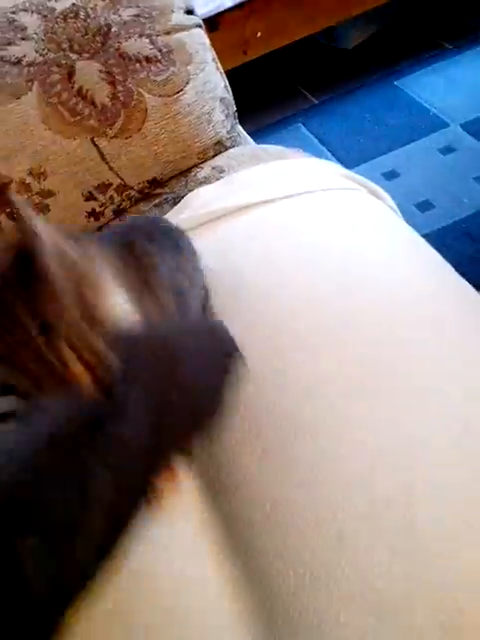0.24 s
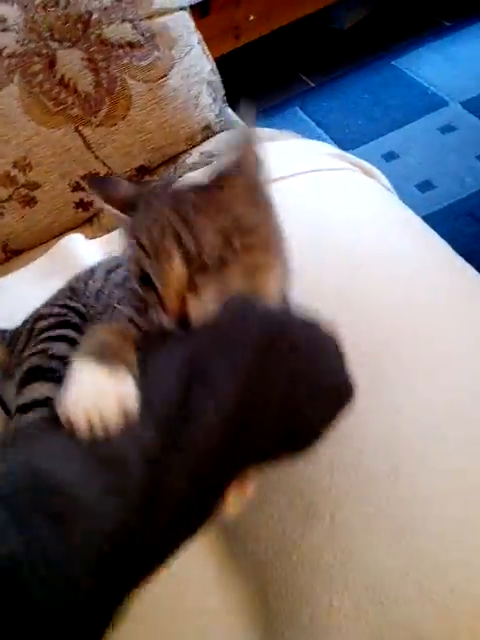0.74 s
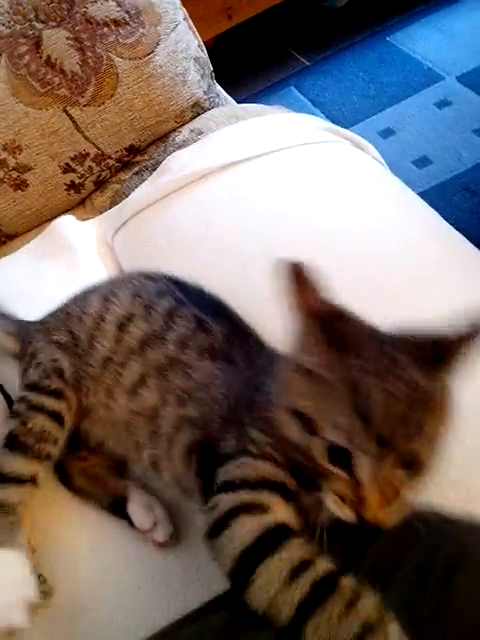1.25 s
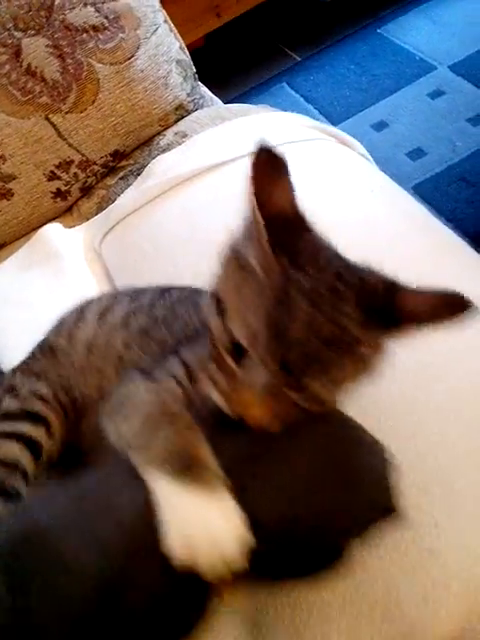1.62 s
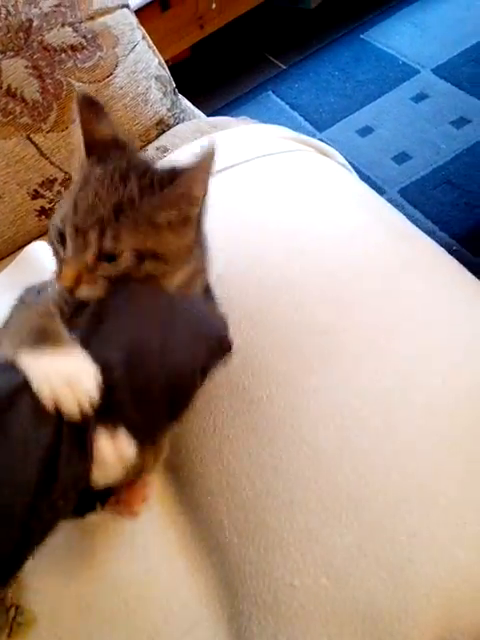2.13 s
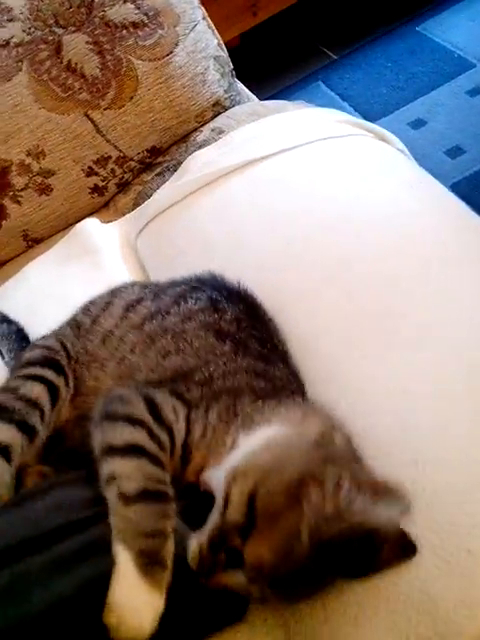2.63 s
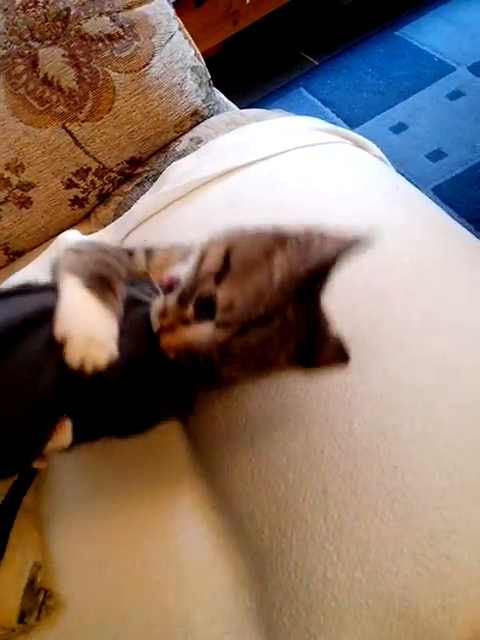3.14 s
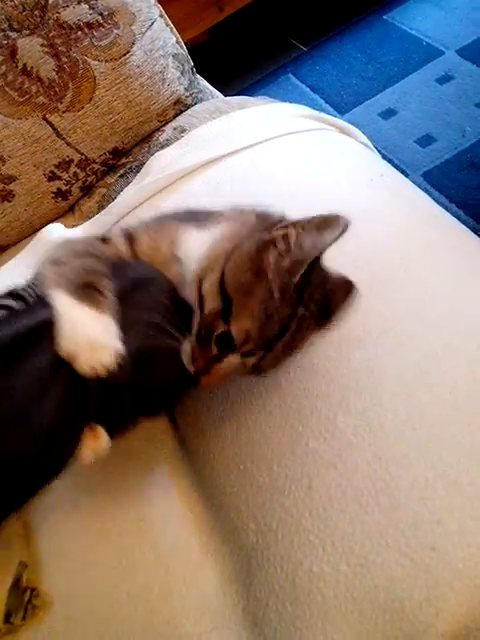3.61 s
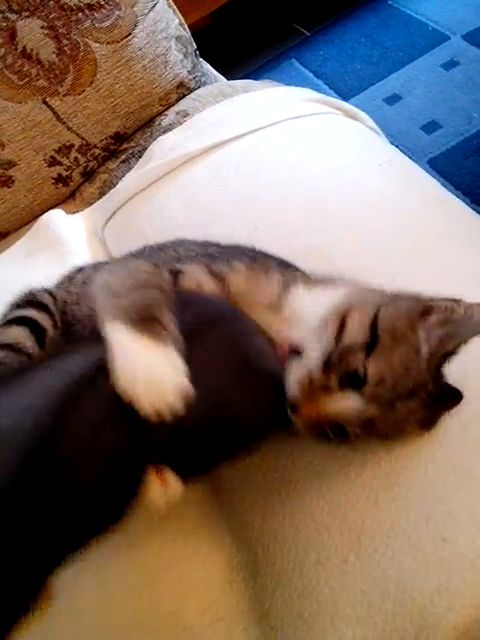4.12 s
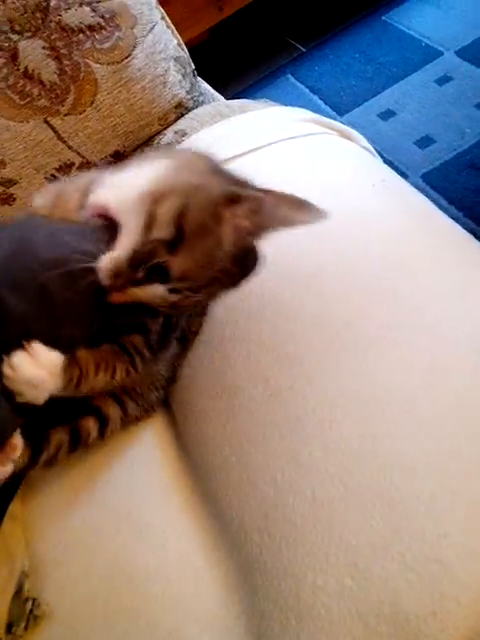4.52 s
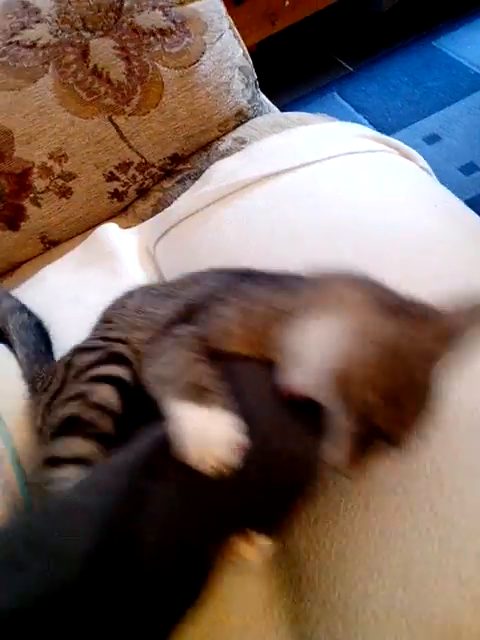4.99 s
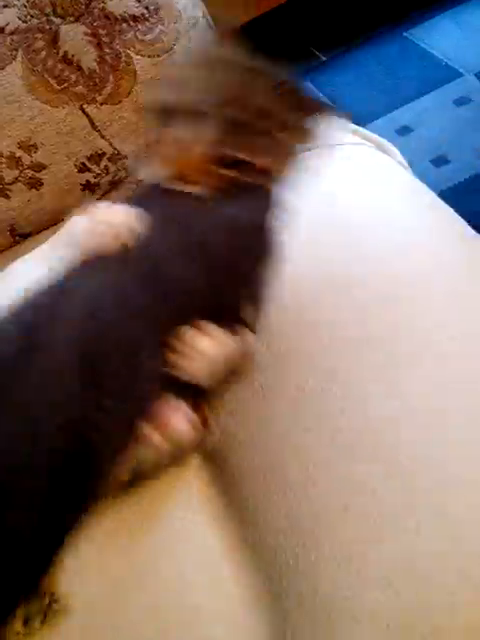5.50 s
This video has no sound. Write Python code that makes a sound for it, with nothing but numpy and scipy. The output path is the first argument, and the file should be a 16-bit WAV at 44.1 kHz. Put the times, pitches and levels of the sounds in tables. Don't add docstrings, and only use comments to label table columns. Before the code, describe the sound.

Bright thread-snag snaps and dull cushion thuds come in uneven bursts as a kitten grapples with a sleeve in a small hissy room.

```python
import sys
import numpy as np
from scipy import signal
from scipy.fft import rfft, irfft, next_fast_len
from scipy.io import wavfile
from scipy.ndimage import uniform_filter1d, map_coordinates

SR = 44100
rng = np.random.default_rng(int(sys.argv[2]) if len(sys.argv) > 2 else 0)


def inscribe(sig):
    pcm = np.round(np.clip(np.atleast_2d(sig).T, -1, 1) * 32767)
    wavfile.write(sys.argv[1], SR, pcm.astype(np.int16))


def how_loud(loudness_db):
    steps = np.asarray(loudness_db, float) / 20
    return 10 ** steps


N = 253575


def unit(x):
    return x / np.sqrt(np.mean(x ** 2) + 1e-20)


def along(points, hz):
    f, value = np.transpose(points)
    return np.interp(np.log(hz + 1), np.log(f + 1), value)


def filtered(x, response):
    m = next_fast_len(len(x) + 8192)
    spectrum = rfft(x, m) * response(np.fft.rfftfreq(m, 1 / SR))
    return irfft(spectrum, m)[:len(x)]


def resonance(f, hz, width_hz):
    return 1j * f * width_hz / (hz * hz - f * f + 1j * f * width_hz)


def wobble(rate):
    knots = rng.standard_normal(int(N * rate / SR) + 4)
    return map_coordinates(knots, [np.arange(N) * rate / SR])


def ring(t, hz, t60, attack):
    x = np.sin(2 * np.pi * hz * t) * how_loud(-60 * t / t60) * (1 - np.exp(-t / attack))
    return x / np.abs(x).max()


def mix_in(out, time_s, sound):
    out[round(time_s * SR):][:len(sound)] += sound


# (frequency [Hz], density [dB per Hz])
HISS_SPECTRUM = [(15, -63), (25, 2), (49, -18.5), (154, -0.5), (258, -4.5), (355, -6.5), (443, -7.5),
                 (477, -10), (672, -11.5), (1100, -14.5), (1670, -16), (3080, -19.5), (6770, -18),
                 (8040, -14), (8870, -20.5), (11500, -86), (19500, -120)]
HISS_DB = -52.5


def hiss():
    air = unit(filtered(rng.standard_normal(N), lambda f: how_loud(along(HISS_SPECTRUM, f))))
    bass = filtered(air, lambda f: 1 / (1 + (f / 600) ** 2))
    return how_loud(HISS_DB) * (air + bass * (how_loud(0.73 * wobble(24)) - 1))


# (frequency [Hz], t60 [s])
ROOM_DECAY = [(200, 0.16), (1500, 0.11), (4500, 0.13), (8000, 0.084)]
# (delay [s], level [dB])
ECHOES = [
    (.0108, -11),
    (.0168, -18),
    (.0205, -21),
    (.0235, -21),
    (.031, -22),
]


def answered(x, wet_db):
    hz, t, z = signal.stft(rng.standard_normal(len(x)), SR, nperseg=256)
    decay = how_loud(-60 * t / along(ROOM_DECAY, hz)[:, None])
    tail = signal.istft(z * decay, SR, nperseg=256)[1][:len(x)]
    tail = tail * np.clip(np.arange(len(x)) / SR / .016, 0, 1) ** 3
    response = how_loud(-1.0) * tail / np.linalg.norm(tail)
    for delay, db in ECHOES:
        first = int(delay * SR)
        response[first] += how_loud(db + 4.5)
        response[first + rng.integers(4, 30)] += how_loud(db + 1.5) * rng.standard_normal()
    return x + how_loud(wet_db) * signal.fftconvolve(x, response)[:len(x)]


# (frequency [Hz], density [dB per Hz])
CUSHION_SPECTRUM = [(70, -19), (130, 1), (250, -5), (480, -6.5), (800, -23), (1200, -43.5)]
# (start [s], length [s], level [dB])
SHIFTS = [(0.122, 0.12, -43), (0.523, 0.26, -47.5), (0.714, 0.13, -44), (.95, 0.21, -48),
          (1.338, 0.36, -49.5), (2.16, .08, -67), (2.548, 0.19, -42.5), (3.045, 0.26, -45),
          (4.342, 0.25, -56), (4.686, 0.035, -43.5), (5.325, 0.11, -64), (5.416, 0.22, -56),
          (5.701, 0.096, -43)]
SHIFT_RISE, SHIFT_HOLD = 0.23, 0.36


def rubbing():
    t = np.arange(N) / SR
    weight = np.zeros(N)
    for start, length, db in SHIFTS:
        rise = (t - start) / SHIFT_RISE
        fall = (start + length - t) / (1 - SHIFT_RISE - SHIFT_HOLD)
        weight += how_loud(db) * np.clip(np.minimum(rise, fall) / length, 0, 1)
    clumps = how_loud(4 * np.tanh(wobble(45)) + 3 * np.tanh(wobble(300)))
    slips = rng.standard_normal(N) * clumps
    grumble = unit(filtered(slips, lambda f: how_loud(along(CUSHION_SPECTRUM, f))))
    return uniform_filter1d(weight, size=441) * grumble


# (start [s], fall [s], centre [Hz], width over centre [ratio], peak level [dB])
FRAYS = [(0.16, 0.09, 2240, 0.74, -42.5), (0.159, 0.11, 6360, .14, -47), (2.041, 0.066, 1520, 0.37, -43.5),
         (2.04, .06, 6200, 0.15, -50), (2.216, 0.088, 1510, 0.25, -46.5), (2.608, 0.12, 1870, 1.7, -40),
         (2.616, 0.13, 3750, 0.26, -45), (2.626, 0.18, 5400, .14, -50.5), (2.643, .16, 466, 0.12, -41),
         (3.228, 0.1, 4270, .6, -46.5), (4.38, 0.11, 1500, 2, -46.5), (5.726, .043, 1860, 1.2, -40.5)]
FRAY_RISE_S = 0.0055
# (start [s], length [s], centre [Hz], width over centre [ratio], peak level [dB])
STROKES = [(0.239, 0.2, 2750, 0.45, -56.5), (0.558, 0.37, 4930, 0.49, -54.5), (0.587, 0.17, 610, 0.91, -48),
           (0.722, 0.14, 4330, 0.19, -49.5), (.72, 0.35, 597, 1, -55), (0.773, 0.09, 2440, 0.97, -48),
           (0.983, 0.24, 1460, 0.77, -54), (0.988, 0.24, 4440, 0.38, -56.5),
           (1.085, 0.074, 1260, 0.52, -47), (1.092, 0.086, 2240, 0.16, -58), (1.3, 0.18, 675, 0.75, -58.5),
           (1.422, 0.19, 3470, 0.22, -47), (1.425, 0.11, 860, 0.75, -50), (2.302, 0.074, 1680, .3, -54.5),
           (4.686, 0.09, 4170, 0.36, -47), (4.721, 0.062, 1680, 0.25, -54.5),
           (5.499, 0.26, 1160, 0.35, -59.5)]
STROKE_RISE = 0.23


def scuffs():
    out, t = np.zeros(N), np.arange(SR // 2) / SR
    grain = how_loud(3 * np.tanh(wobble(70)) + 3.5 * np.tanh(wobble(350)))
    rows = [(start, FRAY_RISE_S, *rest) for start, *rest in FRAYS]
    for start, length, *rest in STROKES:
        rows.append((start, STROKE_RISE * length, (1 - STROKE_RISE) * length, *rest))
    for start, rise, fall, hz, width, db in rows:
        swell = np.sin(np.pi / 2 * t / rise) ** 2
        stroke = np.where(t < rise, swell, how_loud(-20 * (t - rise) / fall))
        piece = out[round(start * SR):][:len(t)]
        slips = rng.standard_normal(len(t))
        slips[:len(piece)] *= grain[round(start * SR):][:len(t)]
        cloth = unit(filtered(slips, lambda f: resonance(f, hz, 1.42 * width * hz) ** 2))
        piece += (how_loud(db) * stroke * cloth)[:len(piece)]
    return out


# (time [s], peak level [dB], pitch [Hz])
THUMPS = [(0.149, -23.5, 463), (.214, -30, 268), (.22, -28.5, 180), (.623, -31.5, 298), (.63, -33, 145),
          (0.729, -38, 373), (.751, -31, 286), (.787, -36, 340), (1.012, -37.5, 342), (1.073, -35, 184),
          (1.34, -43, 324), (1.439, -37, 224), (1.487, -33, 342), (1.495, -25.5, 240), (1.56, -50, 252),
          (2.027, -22.5, 408), (2.089, -37, 151), (2.175, -49, 250), (2.205, -25, 410), (2.599, -21.5, 440),
          (2.612, -22.5, 291), (3.097, -25, 534), (3.156, -24, 263), (3.163, -24, 174), (3.459, -39.5, 320),
          (4.373, -34.5, 396), (4.414, -32, 407), (4.548, -42, 430), (4.688, -37, 144), (5.717, -28, 560)]
SWING_T60_S, SWING_REF_HZ, SWING_LAW = 0.018, 300, 0.59
# (time [s], peak level [dB], pitch [Hz])
KNOCKS = [(.15, -24.5, 733), (.623, -35, 624), (.751, -43, 760), (.787, -33, 545), (1.012, -38, 720),
          (1.073, -39.5, 765), (1.34, -40.5, 630), (2.027, -16, 578), (2.027, -26.5, 980),
          (2.173, -44, 546), (2.6, -23, 1050), (2.612, -50, 1000), (3.156, -25.5, 920), (3.459, -47, 830),
          (4.373, -37, 600), (4.472, -38, 400), (5.33, -38, 170), (5.415, -39.5, 300)]
KNOCK_T60_S, KNOCK_ATTACK_S = 0.0074, .001


def thumps():
    out, t = np.zeros(N + SR), np.arange(int(SR * .4)) / SR
    air_push = 0.041 * ring(t, 141, 0.24, 0.0088)
    for time, db, hz in THUMPS:
        t60 = SWING_T60_S * (SWING_REF_HZ / hz) ** SWING_LAW
        swing = ring(t, hz, t60, .5 / hz)
        mix_in(out, time + .0015, how_loud(db) * (answered(swing, wet_db=-19.5) + air_push))
    for time, db, hz in KNOCKS:
        knock = ring(t, hz, KNOCK_T60_S, KNOCK_ATTACK_S)
        mix_in(out, time + .0015, how_loud(db) * answered(knock, wet_db=-14.5))
    return out[:N]


# (time [s], snap peak level [dB], snap pitch [Hz], room level [dB], weave level [dB])
CLAWS = [(0.1511, -16, 4820, -5.5, -26), (0.2308, -33, 2890, -9, -14), (.7522, -44, 4630, -19, -32),
         (0.786, -22.5, 4380, -9, -26.5), (0.9811, -28, 3930, -2.5, -17.5),
         (0.9928, -26.5, 4040, -3.5, -17), (3.0978, -21.5, 5200, -3, -22), (3.1591, -26, 5020, -2.5, -26),
         (3.2194, -11, 4000, -17.5, -35), (3.2625, -38.5, 3320, 1.5, -28), (3.3626, -23, 3570, -9, -26.5),
         (3.459, -14, 3970, -13, -21), (4.374, -18, 4070, -12, -20.5), (4.4169, -22.5, 4080, -11.5, -22),
         (4.4724, -32, 3700, -9, -33), (4.5474, -24.5, 3800, -6.5, -22), (5.7191, -12.5, 4140, -2, -27.5),
         (5.7344, -15.5, 4760, -13, -22.5), (3.3797, -37, 4000, -13, -25)]
CLAW_WEAVE_HZ = 1187
# (time [s], snap peak level [dB], snap pitch [Hz], room level [dB], weave pitch [Hz])
TEETH = [(0.1604, -24.5, 5140, -7.5, 1420), (0.2206, -41, 2800, -2, 1090), (0.797, -28.5, 4000, -1, 1850),
         (1.0195, -38, 4840, 3, 2040), (1.309, -42, 3850, 0, 2080), (1.9123, -36.5, 3600, -6, 2030),
         (2.0279, -12, 4640, -13.5, 1620), (2.2071, -17, 4040, -10, 1360), (2.6009, -27.5, 4430, 1.5, 1070),
         (2.612, -22.5, 4000, -7, 1160), (4.6901, -30.5, 3780, -3.5, 1090), (5.5194, -44, 3950, -9, 900)]
TOOTH_WEAVE_DB = -10
# (frequency [Hz], width [Hz], level [dB])
PORT = [(3400, 520, -2.5), (4750, 1100, 0), (6500, 700, -8)]
# (frequency [Hz], width [Hz], depth [0-1])
CANCELLED = [(3880, 300, .5), (5800, 500, .4)]
CLAW_SHADE, TOOTH_SHADE = 0.18, 0.77
LEAD_IN_S = 220 / SR
SNAP_WIDTH = 0.5


def port(f):
    return sum(how_loud(db) * resonance(f, hz, width) for hz, width, db in PORT)


def cushion_dip(f):
    return (1 - .58 * resonance(f, 2550, 480)) ** 2


def arm_shadow(f, shade):
    dips = [1 - shade * depth * resonance(f, hz, width) for hz, width, depth in CANCELLED]
    return np.prod(dips, axis=0) ** 2


def plucked_weave(t, hz):
    weave = ring(t, hz, .009, .0002)
    weave -= .6 * ring(t, 1950, .012, .0004)
    weave += .5 * ring(t, 850, .006, .0002)
    weave += .5 * ring(t, 1250, .007, .0002)
    return weave


def snags():
    out, t = np.zeros(N + SR), np.arange(int(SR * .4)) / SR
    late = t - LEAD_IN_S
    lead_in, fray = .02 * how_loud(-20 * abs(late) / .004), .08 * how_loud(-60 * abs(late) / .005)
    fizz = np.where(late < 0, lead_in, fray)
    rows = [(*row, CLAW_WEAVE_HZ, CLAW_SHADE) for row in CLAWS]
    rows += [(*row, TOOTH_WEAVE_DB, weave_hz, TOOTH_SHADE) for *row, weave_hz in TEETH]
    for time, db, hz, wet_db, weave_db, weave_hz, shade in rows:
        release = abs(late) < .5 / SR
        burst = release + fizz * rng.standard_normal(len(t))
        snap = filtered(burst, lambda f: port(f) * resonance(f, hz, SNAP_WIDTH * hz) ** 2)
        weave = np.roll(plucked_weave(t, weave_hz), round(LEAD_IN_S * SR))
        click = filtered(snap / np.abs(snap).max() + how_loud(weave_db) * weave, cushion_dip)
        direct = filtered(click, lambda f: arm_shadow(f, shade))
        heard = answered(click, wet_db) - click + direct
        mix_in(out, time + .0007 - LEAD_IN_S, how_loud(db) * heard)
    return out[:N]


def scene():
    return (hiss() + rubbing() + scuffs() + thumps() + snags())[None]


def band_limit(x):
    return signal.sosfilt(signal.butter(12, 9020, fs=SR, output="sos"), x)


# (from [s], to [s], from [Hz], to [Hz])
DROPOUTS = [(.16, .21, 7600, 8500), (.805, .845, 7600, 8500), (1.52, 1.55, 8500, 9500),
            (1.525, 1.55, 7100, 7500), (2.015, 2.075, 7100, 9500), (2.19, 2.2, 7600, 9500),
            (2.262, 2.272, 7600, 9500), (3.195, 3.232, 7100, 9500), (3.31, 3.345, 7300, 9500),
            (3.345, 3.43, 7600, 8600), (4.38, 4.505, 7600, 8500), (4.38, 4.43, 6600, 6900),
            (5.72, 5.75, 7700, 8500)]


def record(dry):
    treble = [(6800, 1), (7600, -10.5), (8400, -21), (9050, -30.5), (9200, -66)]  # (Hz, dB)
    edges = lambda f: (1j * f / (75 + 1j * f)) ** 2 * how_loud(along(treble, f))
    hz, t, z = signal.stft(filtered(dry[0], edges), SR, nperseg=512, noverlap=384)
    for start, end, low, high in DROPOUTS:
        in_band = (hz[:, None] > low) & (hz[:, None] < high)
        z[in_band & (t > start) & (t < end)] = 0
    kept = signal.istft(z, SR, nperseg=512, noverlap=384)[1][:N]
    return band_limit(kept[None])


dry = scene()
out = record(dry)
inscribe(out)
```